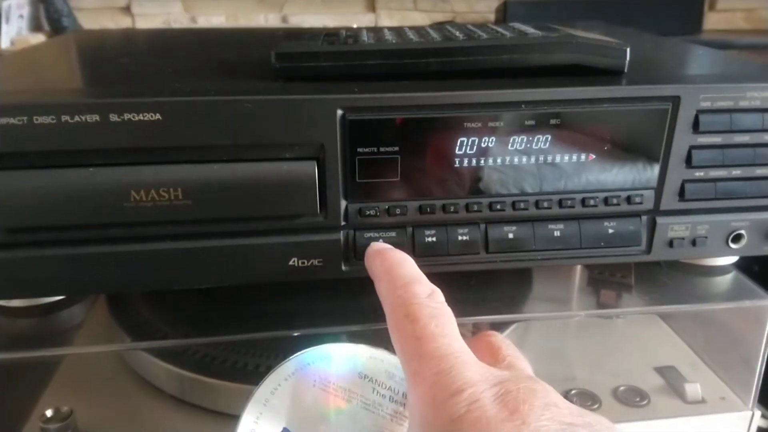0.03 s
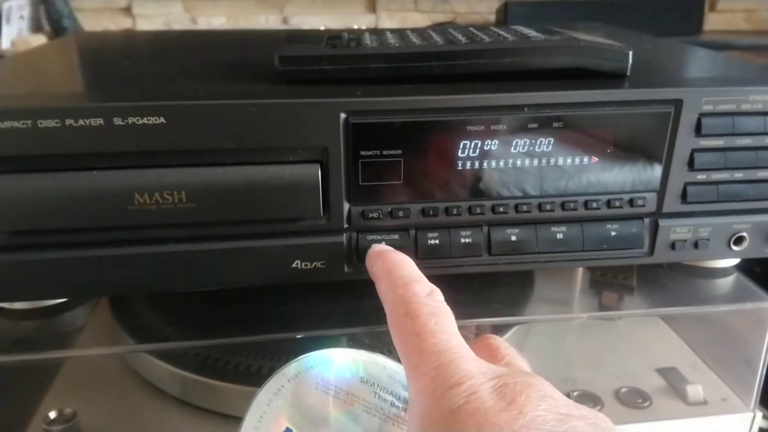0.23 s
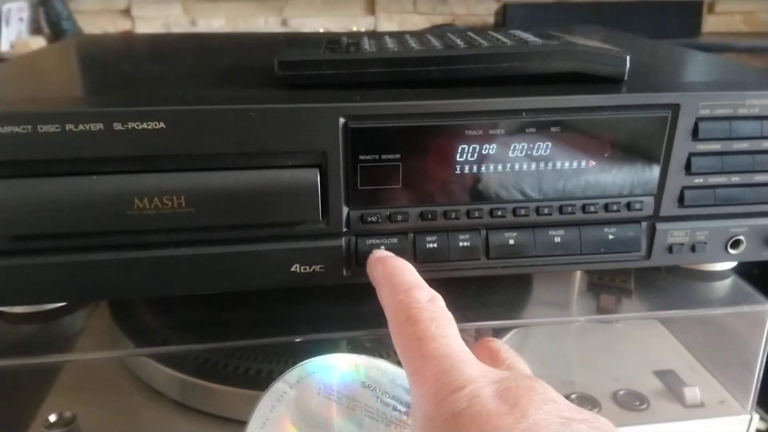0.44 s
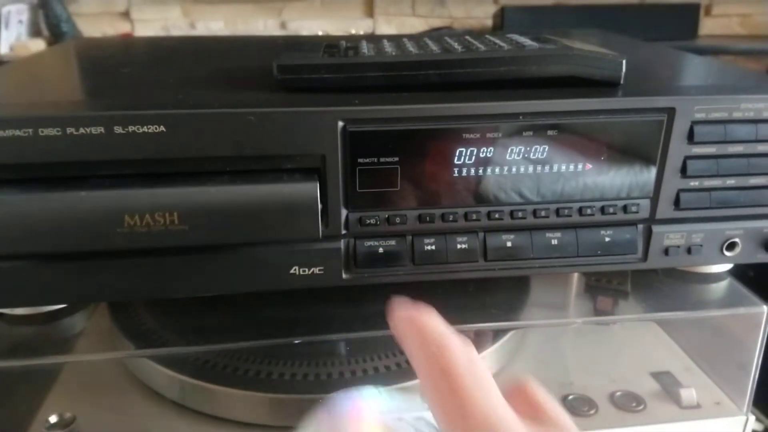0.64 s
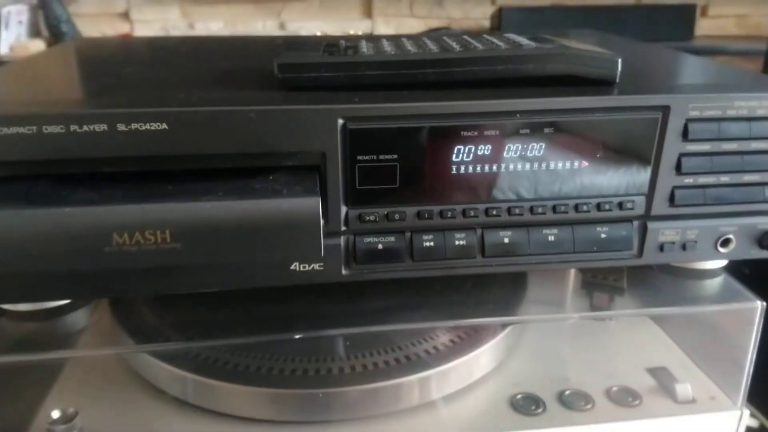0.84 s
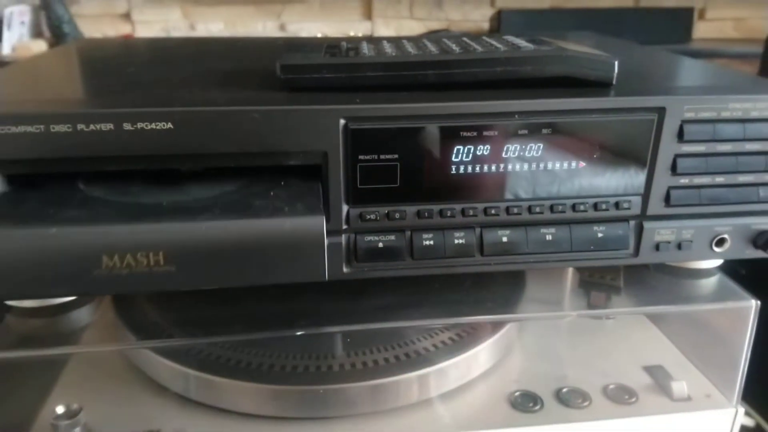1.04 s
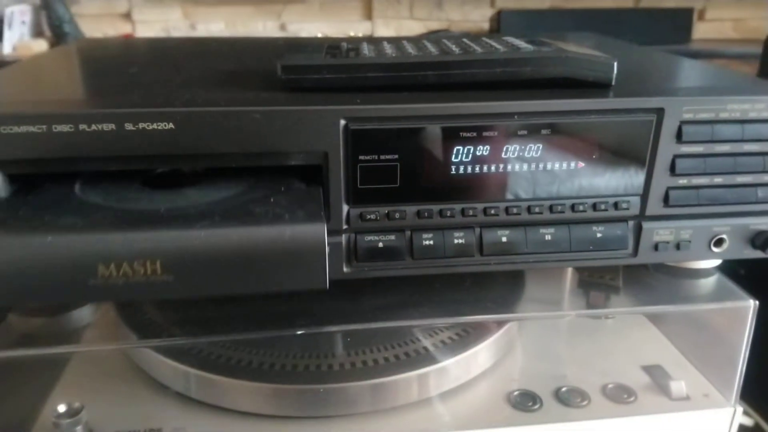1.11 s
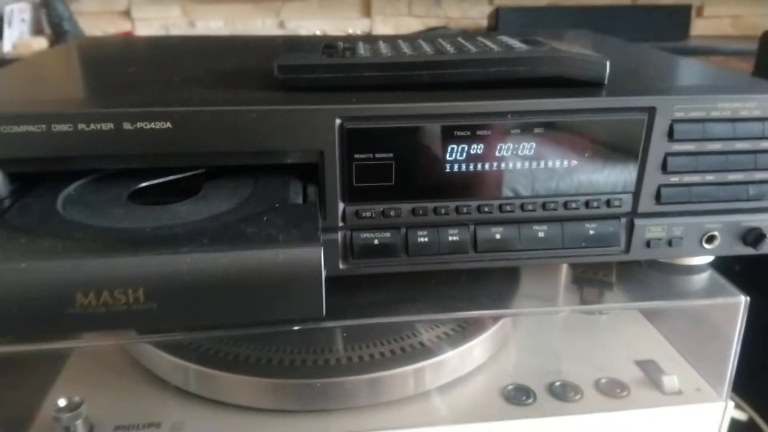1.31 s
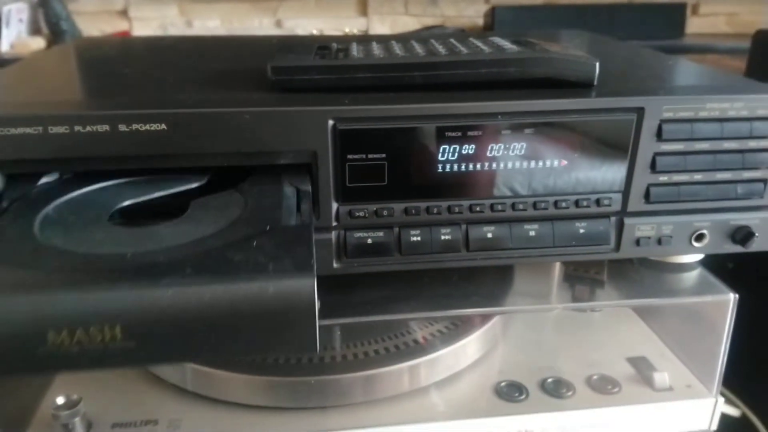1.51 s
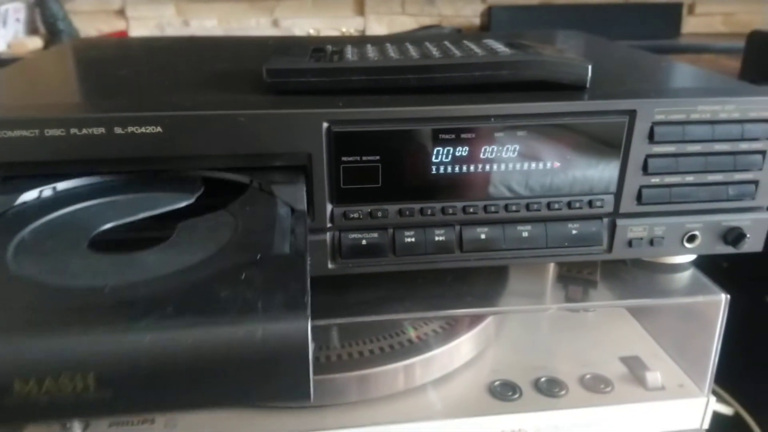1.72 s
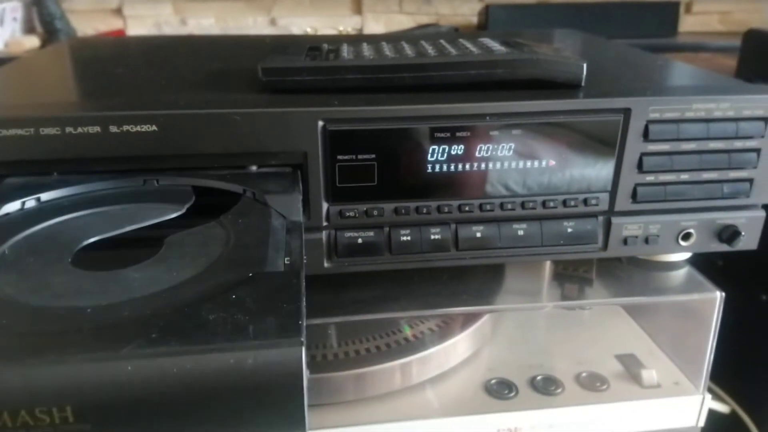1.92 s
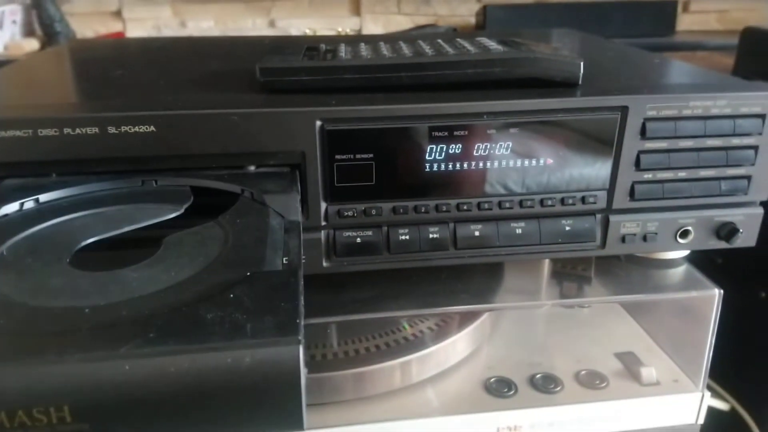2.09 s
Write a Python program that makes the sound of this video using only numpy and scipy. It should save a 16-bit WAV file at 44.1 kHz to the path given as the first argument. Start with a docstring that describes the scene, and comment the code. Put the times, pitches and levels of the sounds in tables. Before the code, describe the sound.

Close by in a quiet little room, a plastic disc tray slides out of its player. A sharp button click comes first, then a brief clatter, a humming motor with ticking gears and a soft hiss, and a final clunk.

```python
"""A quiet small room, close to a disc player. The eject button clicks, the motor takes up the gears
and the drive unclamps with a clatter. The plastic tray slides out: gear teeth rattle the mechanism,
the motor hums in the metal case and the runners hiss. The tray hits its end stop with a clunk,
and the case rings on faintly."""
import sys
import numpy as np
from scipy import signal
from scipy.fft import rfft, irfft, next_fast_len
from scipy.io import wavfile
from scipy.ndimage import uniform_filter1d, map_coordinates

SR = 44100
rng = np.random.default_rng(int(sys.argv[2]) if len(sys.argv) > 2 else 0)


def generate_wav(signal):
    """Clip the signal to [-1, 1] and save it as 16-bit WAV at the path in sys.argv[1]."""
    frames = np.transpose(np.atleast_2d(signal))
    scaled = np.clip(frames, -1, 1) * 32767
    pcm = np.round(scaled).astype(np.int16)
    wavfile.write(sys.argv[1], SR, pcm)


N = 94815

# faders of the drive (t/s, case rumble level/dB, gear rattle level/dB, runner hiss level/dB)
DRIVE_LEVELS = [(0.355, -74, -62, -56), (0.385, -51, -57, -85), (0.43, -50.5, -57.5, -70),
                (0.49, -59, -48.5, -69), (0.6, -53.5, -55, -72), (0.645, -53.5, -59.5, -67),
                (0.74, -50.5, -56, -65.5), (0.87, -52, -61, -60.5), (1.08, -60.5, -65, -59.5),
                (1.14, -57.5, -68, -61.5), (1.45, -63, -65, -62.5), (1.73, -56.5, -67, -62.5),
                (1.82, -76, -53.5, -54.5), (1.92, -65, -89, -82.5)]
# swell of the cam wheel under load (t/s, level/dB)
CAM_LOAD = [(0.44, -70), (0.56, -58), (0.68, -61), (0.78, -64), (0.9, -82)]
# resonances of the metal case, the sliding tray and the cam wheel (f/Hz, relative level/dB, t60/s)
CASE_MODES = [(74, -12, .25), (102, -17, .2), (170, -7, .22), (203, -10, .22), (236, -1, .16),
              (269, 0, .16), (290, -8, .17), (335, -15, .22), (380, -14, .3), (401, -19, .3),
              (605, -18, .3), (631, -15, .28)]
SLIDE_MODES = [(603, -3, .2), (631, 0, .2), (706, -4, .16), (745, -5, .12), (905, -6, .14),
               (3230, -11, .05)]
CAM_MODES = [(1370, -5, .06), (1690, -2, .06), (1740, -1, .07), (2420, 0, .08), (2660, -7, .05),
             (2870, -7, .06), (5170, -4, .03)]
# EQ of the gear rattle, the runner hiss and the shelf's low boom (f/Hz, relative level/dB)
RATTLE_EQ = [(60, -34), (130, 5), (270, 2), (420, 5), (700, 1.5), (1050, -6), (1350, -2), (1550, -9),
             (1800, -2), (3000, -8), (5500, -6), (7000, -32), (8000, -84)]
RUNNER_EQ = [(300, 5.5), (900, 0), (2000, -7.5), (3200, 2), (4000, -3.5), (4800, 3.5), (6000, 1),
             (7100, -6.5), (8000, -23), (10000, -14), (15000, -64)]
SHELF_EQ = [(25, -11), (45, -10), (72, -6.5), (105, -18.5), (140, -10), (400, -60)]
TOOTH_HZ, TOOTH_SCATTER, TOOTH_SIZE_DB = 176.8, 0.25, 4  # scatter is in tooth periods
SHELF_DB, SLIDE_DB = -16, -5.5  # relative to the case rumble and the gear rattle


def drive():
    """Uneven gear teeth shake the case, the tray and the cam wheel while the runners hiss."""
    rumble_db, rattle_db, hiss_db = curves(DRIVE_LEVELS)
    cam_db, = curves(CAM_LOAD)
    teeth = gear_teeth()
    rumble = shaken(teeth, CASE_MODES) + amp(SHELF_DB) * noise(SHELF_EQ)
    contact = signal.fftconvolve(teeth, fade(0, t60=0.046, attack_s=0.00062))[:N]
    rattle = unit(contact * amp(2.1 * wobble(53.78)) * noise(RATTLE_EQ))
    slide = amp(SLIDE_DB) * spread([shaken(teeth, SLIDE_MODES) for _ in range(2)])
    flutter_db = 0.56 * wobble(300) + 0.27 * wobble(24.9)
    hiss = unit(amp(flutter_db) * noise(RUNNER_EQ))
    cam = unit(spread([shaken(teeth, CAM_MODES) for _ in range(2)]))
    travel = amp(rumble_db) * rumble + amp(rattle_db) * (rattle + slide) + amp(hiss_db) * hiss
    return gate(DRIVE_LEVELS) * travel + gate(CAM_LOAD) * amp(cam_db) * cam


def gear_teeth():
    """One impulse per meshing tooth, loose in timing and weight."""
    count = int(2 * TOOTH_HZ * N / SR)
    timing, size = rng.standard_normal((count, 2)).T
    onsets = np.abs((np.arange(count) + TOOTH_SCATTER * timing) * SR / TOOTH_HZ).astype(int)
    return np.bincount(onsets, amp(TOOTH_SIZE_DB * np.tanh(size)), N)[:N]


# hits of the clamp letting go and the tray at its stop (t/s, clack level/dB, thud level/dB, clack t60/s)
CLAMP_HITS = [(0.3635, -54, -70, 0.16), (0.375, -48.5, -61, 0.08), (0.437, -52, -50.5, 0.15),
              (0.4452, -47.5, -56, 0.21), (0.4605, -39, -51, 0.11), (0.469, -45, -42.5, 0.059),
              (0.498, -44.5, -43, 0.079), (0.514, -62, -46, 0.072), (0.536, -46.5, -55, 0.14),
              (0.563, -50, -48, 0.11), (0.576, -48, -57, 0.12)]
STOP_HITS = [(1.752, -34, -46, 0.085), (1.7715, -45, -45.5, 0.08), (1.785, -41.5, -44.5, 0.09),
             (1.794, -44, -64, 0.053), (1.85, -55.5, -65, 0.12)]
# resonances of the clamp and of the struck tray (f/Hz, relative level/dB, t60/s)
CLAMP_MODES = [(630, -4, .18), (705, 0, .2), (749, -2, .2), (904, -5, .15), (1322, -12, .12),
               (1348, -9, .14), (2420, -11, .04)]
TRAY_MODES = [(606, -17, .7), (700, -14, .14), (806, -12, .16), (872, -11, .15), (931, -9, .2),
              (1107, -9, .14), (1160, -6, .17), (1225, -11, .12), (1440, -13, .18), (2280, -17, .16),
              (2560, -12, .07), (2885, -18, .15), (4938, -15, .11), (5219, -15, .11)]
# EQ of a plastic clack (f/Hz, relative level/dB)
CLACK_EQ = [(100, -0.5), (300, -71), (480, -7), (700, 3), (950, 0), (1200, 0), (1550, -7), (2500, -1.5),
            (3800, -9), (5300, -6.5), (7000, -21), (8000, -33), (9500, -29.5), (15000, -74)]


def knocks(hits, modes, ring_db, thud_cut_hz):
    """Each hit layers a plastic clack, the struck part's ring (ring_db re the clack) and a case thud."""
    clack = bursts([(s, db, t60) for s, db, _, t60 in hits], CLACK_EQ, attack_s=0.00065)
    part = struck_wide([(s, db + ring_db) for s, db, _, _ in hits], modes)
    thud = struck([(s, db) for s, _, db, _ in hits], CASE_MODES)
    low_cut = signal.butter(3, thud_cut_hz, "high", fs=SR, output="sos")
    return clack + part + signal.sosfilt(low_cut, thud)


# EQ of the button's snap (f/Hz, relative level/dB)
BUTTON_EQ = [(100, -35), (420, -22), (850, -20), (1400, -4.5), (2300, 3), (3400, 3.5), (3900, -3),
             (5400, -0.5), (7000, -18), (8000, -34), (15000, -30)]
# resonances of its plastic (f/Hz, level/dB, t60/s)
BUTTON_MODES = [(641, -59, .2), (913, -53, .12), (1960, -59, .1), (2342, -47, .09), (2660, -55, .09),
                (2830, -55, .09), (3270, -49, .11), (3488, -48, .24), (4823, -53, .1), (5230, -52, .08)]
# its taps against the front panel (t/s, level/dB, t60/s)
BUTTON_TAPS = [(0.2148, -53, 0.053), (0.2215, -45.5, 0.18)]
BUTTON_S, BUTTON_DB, BUTTON_T60_S, BUTTON_PUSH_DB = 0.2102, -34.5, 0.045, -55.5


def eject_button():
    """The button snaps, rings, nudges the case and bottoms out on the panel."""
    snap = bursts([(BUTTON_S, BUTTON_DB, BUTTON_T60_S)], BUTTON_EQ, attack_s=0.00009)
    plastic = struck_wide([(BUTTON_S, 0)], BUTTON_MODES)
    push = struck([(BUTTON_S, BUTTON_PUSH_DB)], CASE_MODES)
    return snap + plastic + push + bursts(BUTTON_TAPS, CLACK_EQ, attack_s=0.0022)


# EQ of the catch's bright snap (f/Hz, relative level/dB)
CATCH_EQ = [(200, -31), (1500, -8), (2700, 2), (4000, -0.5), (5200, 5.5), (7000, 3), (8000, -29),
            (9500, -26), (15000, -24)]
CATCH_S, CATCH_DB, CATCH_T60_S = 1.738, -40.5, 0.14


def end_catch():
    """The tray strikes a small catch just before its stop."""
    return bursts([(CATCH_S, CATCH_DB, CATCH_T60_S)], CATCH_EQ, attack_s=0.00019)


# cues of the gear ticks (t/s, level/dB)
TICKS = [(0.446, -45.5), (0.6605, -49.5), (0.686, -53), (0.7085, -45), (0.724, -53), (0.765, -51),
         (0.8327, -50), (0.948, -49.5), (0.9702, -49)]


def gear_ticks(t60=0.04):
    """The plastic gears tick as they take up their play."""
    return bursts([(s, db, t60) for s, db in TICKS], RUNNER_EQ, attack_s=0.0011)


# pitch and fader of the tray's judder and the motor's hum (t/s, f/Hz, level/dB)
JUDDER = [(0.64, 240, -70), (0.73, 236, -51), (0.8, 238, -59), (0.845, 233, -46), (0.93, 229, -52),
          (1.1, 227, -49.5), (1.125, 234, -65), (1.31, 232, -63), (1.335, 233, -49), (1.355, 232, -67),
          (1.5, 226, -68), (1.59, 223, -57), (1.64, 228, -68), (1.72, 232, -58), (1.8, 232, -75)]
HUM = [(0.36, 160, -80), (0.6, 170, -65), (0.95, 172, -67), (1.15, 173, -60), (1.3, 177, -59),
       (1.59, 178, -61), (1.65, 177, -69), (1.72, 177, -63), (1.85, 168, -78)]
WHINE_RATIO, WHINE_DB = 17, -26.5  # pitch and level relative to the hum


def judder_and_hum():
    """The tray judders in swells over the motor's hum: two low, rough tones."""
    return tone(JUDDER, rough_db=2.5, rough_rate=60) + tone(HUM, rough_db=2, rough_rate=45)


def gear_whine():
    """The gears add a thin, high line that tracks the motor."""
    line = [(s, hz * WHINE_RATIO, db + WHINE_DB) for s, hz, db in HUM]
    return tone(line, rough_db=4.5, rough_rate=220)


# low thumps of the shelf (t/s, level/dB, t60/s)
THUMPS = [(0.48, -50, 0.23), (1.8, -56, 0.45)]


def shelf_thumps():
    """The shelf booms softly under the clamp's release and the tray's stop."""
    return bursts(THUMPS, SHELF_EQ, attack_s=0.0085)


# reverb time of the room (f/Hz, t60/s)
ROOM_T60 = [(200, 0.46), (600, 0.34), (3000, 0.45), (7000, 0.42), (15000, 0.11)]
ROOM_DB = -9


def reverb(x):
    """Wall reflections blur into a short tail, each band dying at its own speed."""
    hz, t, spectrum = signal.stft(rng.standard_normal((2, SR // 2)), SR, nperseg=256)
    envelope = amp(-60 * t / along(ROOM_T60, hz)[:, None]) * (1 - np.exp(-t / 0.0034))
    _, tail = signal.istft(spectrum * envelope, SR, nperseg=256)
    return spread(signal.fftconvolve(x, tail / np.linalg.norm(tail[0]), axes=1)[:, :N])


# EQ of the room's air (f/Hz, relative level/dB)
AIR_EQ = [(20, -22), (40, 3), (62, 12.5), (120, -1), (250, 0), (340, -9), (650, -8), (1100, -7.5),
          (2200, -6), (4000, -11), (5200, -9.5), (8000, -19), (15000, -24.5)]
# its fader (t/s, level/dB)
AIR_LEVEL = [(0, -64), (0.2, -64.5), (1.7, -70.5), (2.0, -69), (2.14, -72)]


def room_tone():
    """A faint, bass-heavy bed of air."""
    air_db, = curves(AIR_LEVEL)
    return amp(air_db) * noise(AIR_EQ)


# stereo image (f/Hz, left-right correlation)
CORRELATION = [(60, 0.49), (180, 0.84), (400, 0.71), (800, 0.75), (1500, 0), (3000, 0.076), (15000, 0)]


def spread(pair):
    """Two unrelated signals become left and right, narrow in the lows and wide on top."""
    angle = lambda hz: np.arccos(np.clip(along(CORRELATION, hz), -1, 1)) / 2
    mid, side = filtered(pair, lambda hz: np.array([np.cos(angle(hz)), np.sin(angle(hz))]))
    return np.array([mid + side, mid - side])


def ring(modes, vary_db):
    """An object's answer to one blow: decaying sines, random in polarity and a little in level."""
    t = np.arange(SR // 2) / SR
    chance = rng.standard_normal((len(modes), 2))
    waves = sum(np.sign(flip) * amp(db + vary_db * size - 60 * t / t60) * np.sin(2 * np.pi * hz * t)
                for (hz, db, t60), (size, flip) in zip(modes, chance))
    return waves * (1 - np.exp(-t / 0.0018))


def shaken(teeth, modes):
    """Modes kept ringing by tooth impulses of random polarity, at rms 1."""
    kicks = teeth * rng.choice([-1, 1], N)
    return unit(signal.fftconvolve(kicks, ring(modes, vary_db=-1.5))[:N])


def struck(blows, modes):
    """Modes rung anew by each (t/s, level/dB) blow."""
    out = np.zeros(N + SR)
    for s, db in blows:
        out[round(s * SR):][:SR // 2] += amp(db) * ring(modes, vary_db=-0.2)
    return out[:N]


def struck_wide(blows, modes):
    """Struck modes, each reaching left and right in its own way."""
    return spread([struck(blows, modes), struck(blows, modes)])


def bursts(rows, eq, attack_s):
    """Dense, fast-dying ring: one noise burst per (t/s, level/dB, t60/s) row."""
    power = sum((amp(db) * fade(s, t60, attack_s)) ** 2 for s, db, t60 in rows)
    return noise(eq) * np.sqrt(power)


def tone(rows, rough_db, rough_rate):
    """A sine gliding through (t/s, f/Hz, level/dB) rows with a shaky level."""
    hz, db = curves(rows)
    envelope = gate(rows) * amp(db + rough_db * wobble(rough_rate))
    return np.sqrt(2) * envelope * np.sin(2 * np.pi * np.cumsum(hz) / SR)


def noise(eq):
    """Coloured stereo noise of rms 1."""
    white = rng.standard_normal((2, N))
    return unit(spread(filtered(white, lambda hz: amp(along(eq, hz)))))


def fade(s, t60, attack_s):
    """Envelope of a blow at time s."""
    t = np.maximum(np.arange(N) / SR - s, 0)
    return amp(-60 * t / t60) * (1 - np.exp(-t / attack_s))


def gate(rows):
    """Open from a table's first time to its last, with soft edges."""
    t = np.arange(N) / SR
    is_open = (t > rows[0][0]) & (t < rows[-1][0])
    return uniform_filter1d(is_open.astype(float), size=400)


def wobble(rate):
    """A smooth random curve, rate knots a second."""
    knots = rng.standard_normal(int(N * rate / SR) + 4)
    return map_coordinates(knots, [np.arange(N) * rate / SR])


def curves(rows):
    """One automation curve for each column after the time."""
    times, *columns = np.transpose(rows)
    return [np.interp(np.arange(N) / SR, times, column) for column in columns]


def along(points, hz):
    """Read (f/Hz, value) points on a log frequency axis."""
    freqs, values = np.transpose(points)
    return np.interp(np.log(hz + 1), np.log(freqs + 1), values)


def filtered(x, response):
    """x through a gain given as a function of frequency."""
    size = next_fast_len(N + SR // 2)
    return irfft(rfft(x, size) * response(np.fft.rfftfreq(size, 1 / SR)), size)[..., :N]


def amp(db):
    """Decibels to gain."""
    return 10 ** (np.asarray(db) / 20)


def unit(x):
    """Scaled to rms 1."""
    return x / np.sqrt(np.mean(x ** 2) + 1e-20)


def scene():
    """The mechanism feeds the reverb; judder and hum stay dry, over the room tone."""
    clicks = eject_button() + end_catch() + gear_ticks()
    unclamp = knocks(CLAMP_HITS, CLAMP_MODES, ring_db=-7.5, thud_cut_hz=25)
    travel = drive() + gear_whine()
    end_stop = knocks(STOP_HITS, TRAY_MODES, ring_db=-4, thud_cut_hz=140)
    player = clicks + unclamp + travel + end_stop + shelf_thumps()
    return player + judder_and_hum() + amp(ROOM_DB) * reverb(player) + room_tone()


# pan of each band at the microphones (f/Hz, left minus right level/dB)
MIC_BALANCE = [(500, 0), (1300, -1), (2400, 6), (3200, -0.5), (4200, -11.5), (5300, -14), (6000, -10.5),
               (6700, 6), (8500, 9.5), (11000, 10), (14000, -2)]
MIC_HISS_DB, LOW_CUT_HZ, TOP_HZ = -74.5, 47, 15900


def record(dry):
    """Two microphones colour the treble differently, hiss a little and cut the sub and the very top."""
    def pan(hz):
        gains = amp(np.array([[0.5], [-0.5]]) * along(MIC_BALANCE, hz))
        return gains / np.sqrt(np.mean(gains ** 2, axis=0))
    heard = filtered(dry, pan) + amp(MIC_HISS_DB) * rng.standard_normal((2, N))
    return filtered(heard, lambda hz: (hz < TOP_HZ) * np.sqrt(hz ** 8 / (hz ** 8 + LOW_CUT_HZ ** 8)))


dry = scene()
out = record(dry)
generate_wav(out)
```